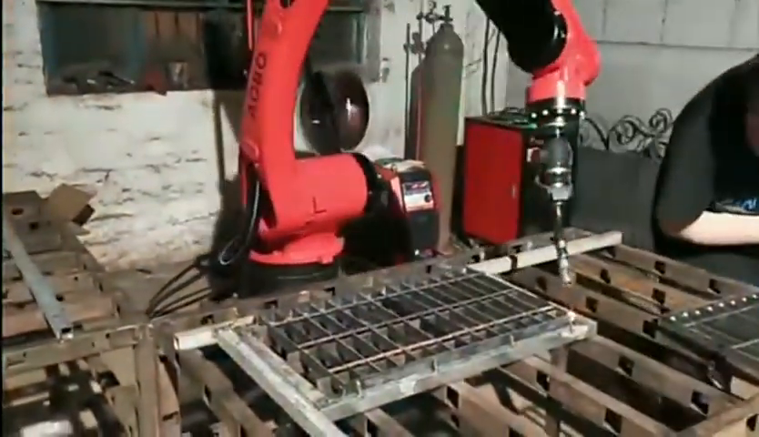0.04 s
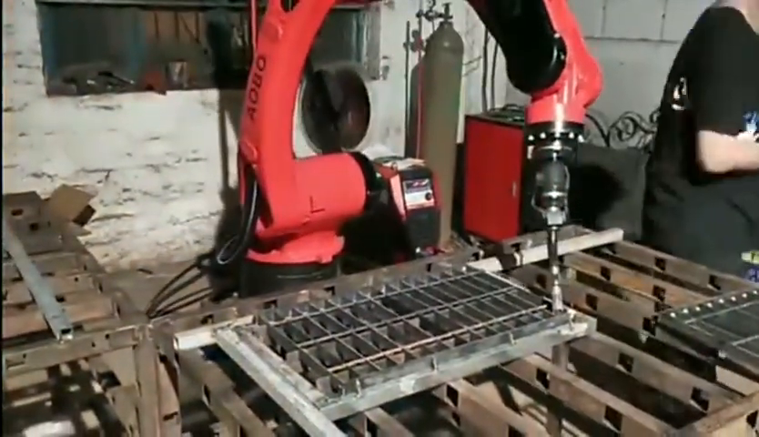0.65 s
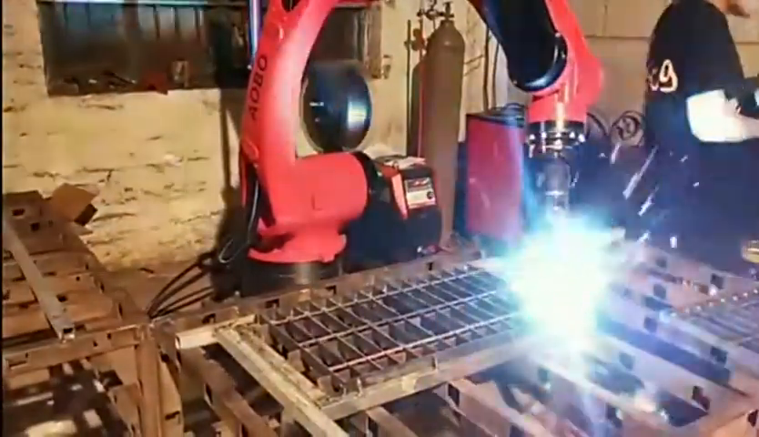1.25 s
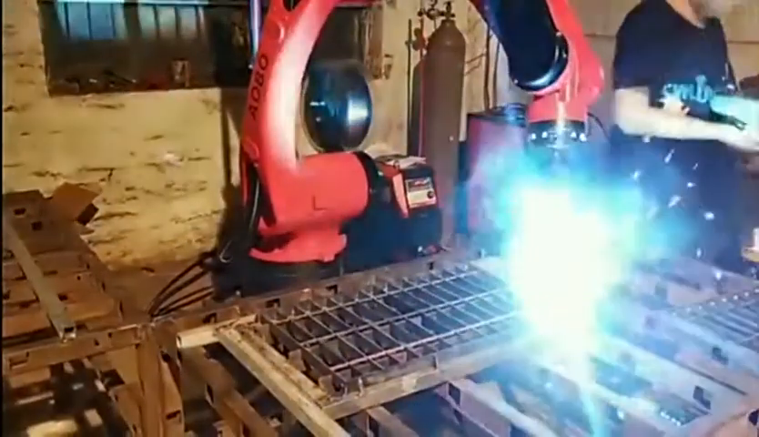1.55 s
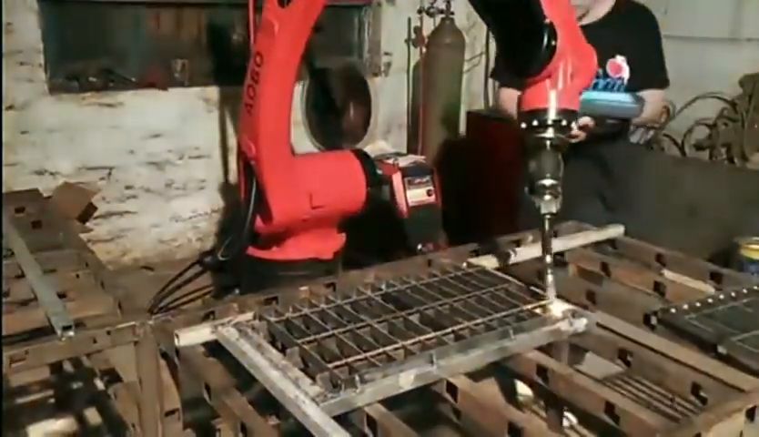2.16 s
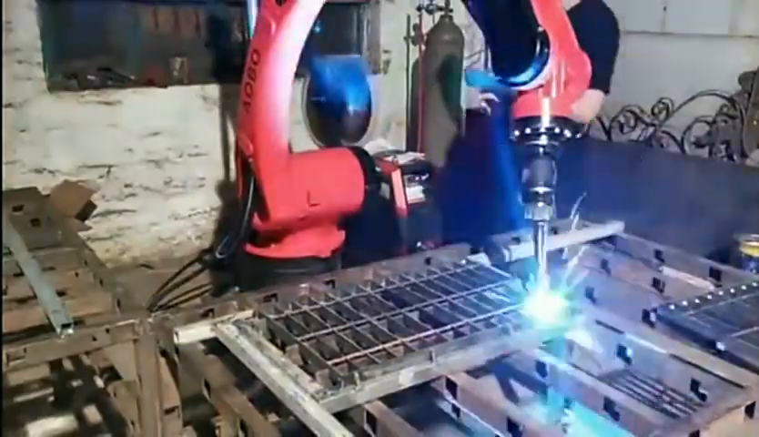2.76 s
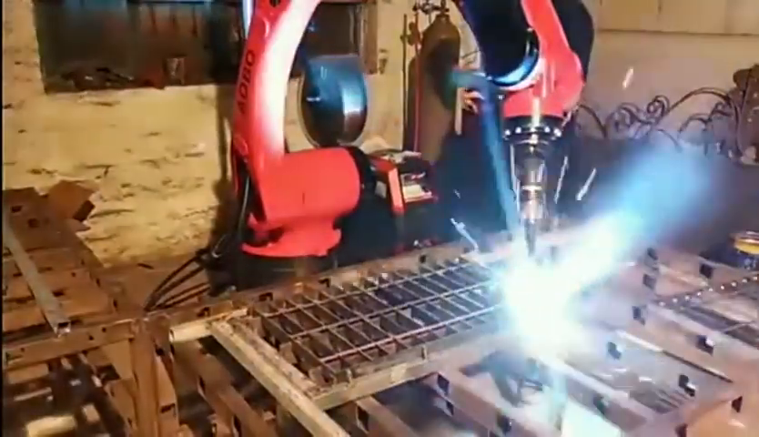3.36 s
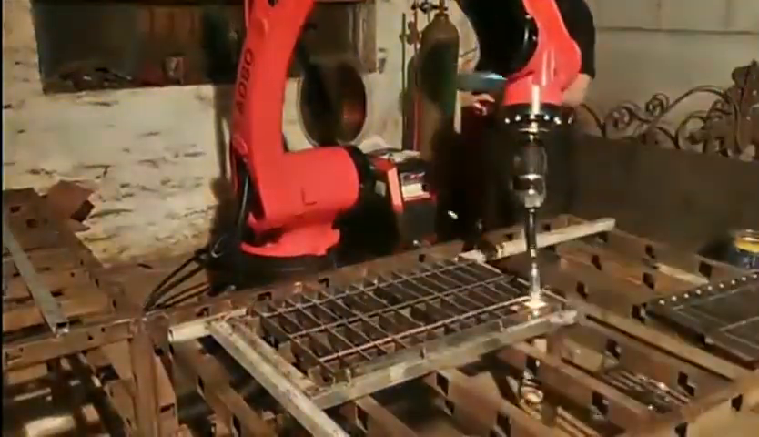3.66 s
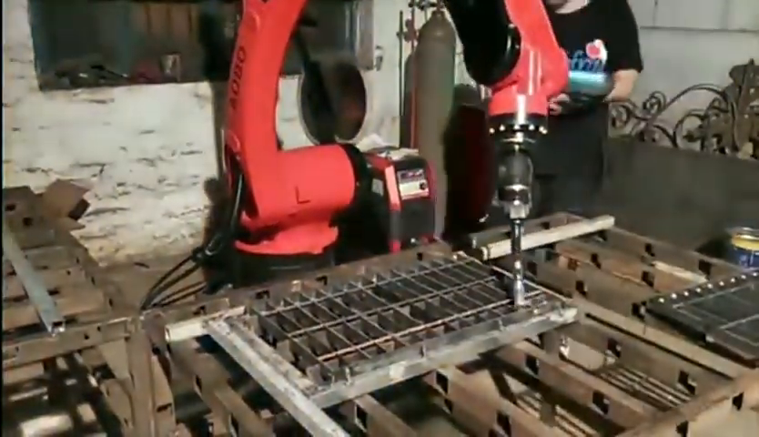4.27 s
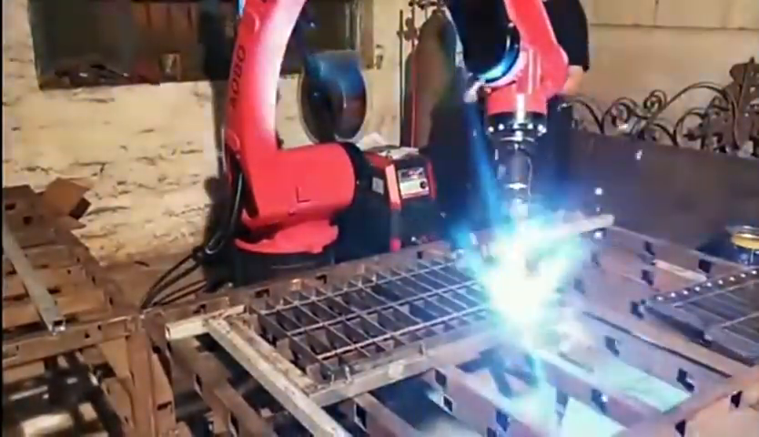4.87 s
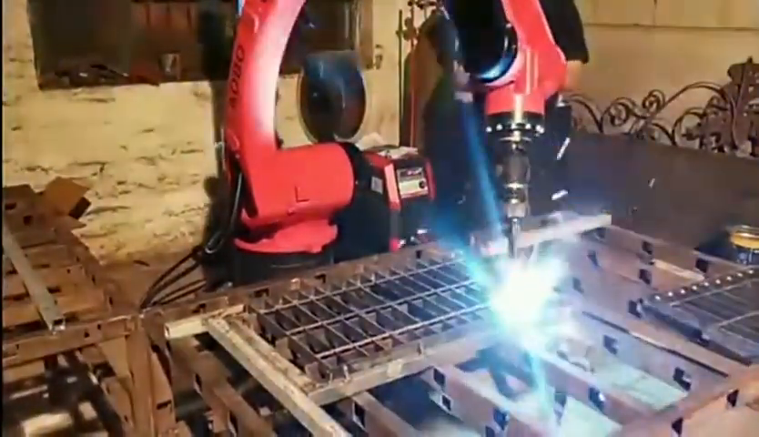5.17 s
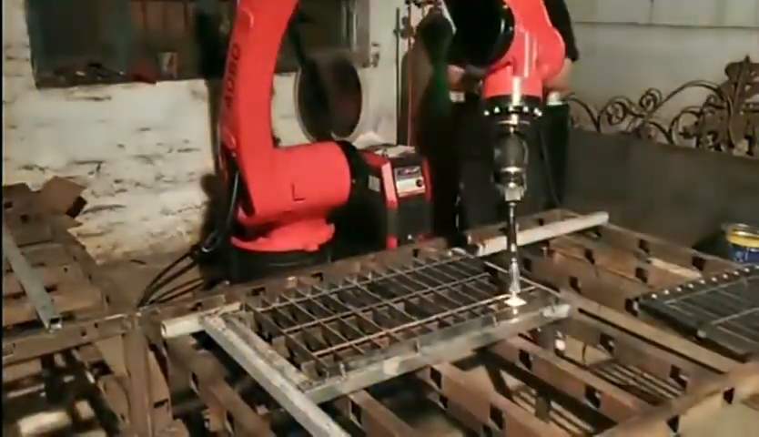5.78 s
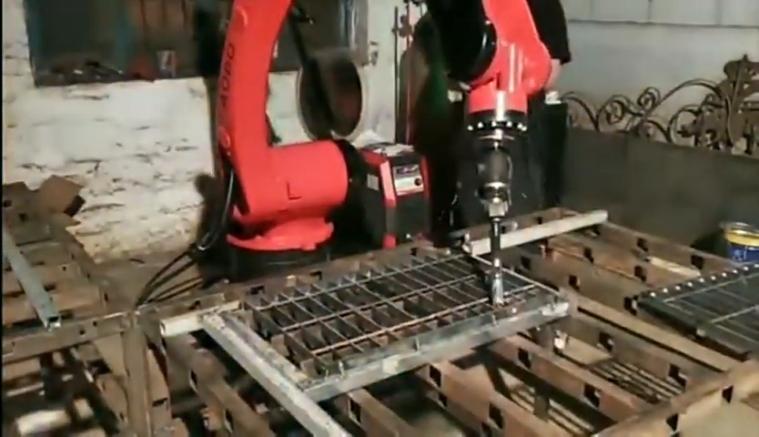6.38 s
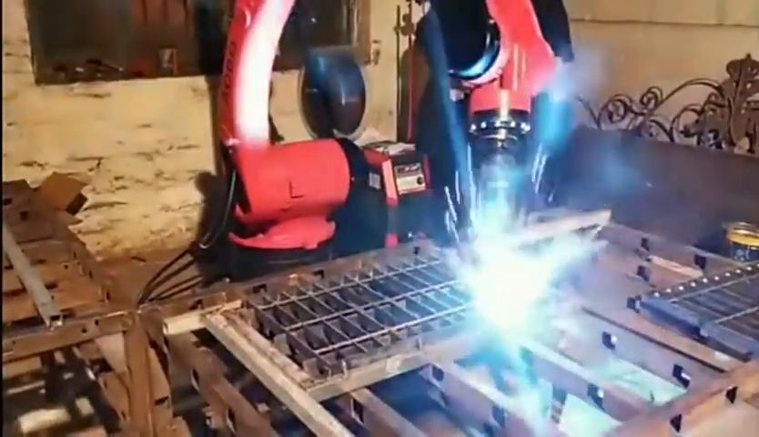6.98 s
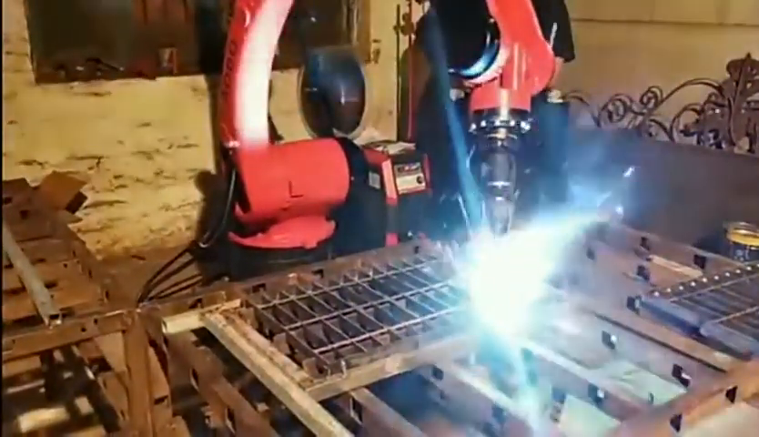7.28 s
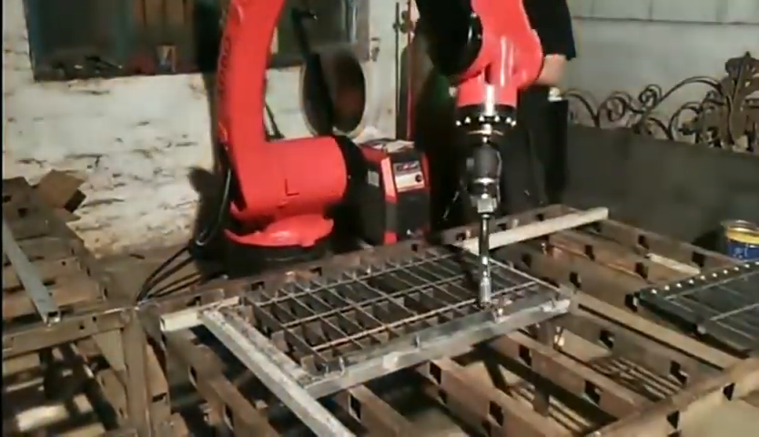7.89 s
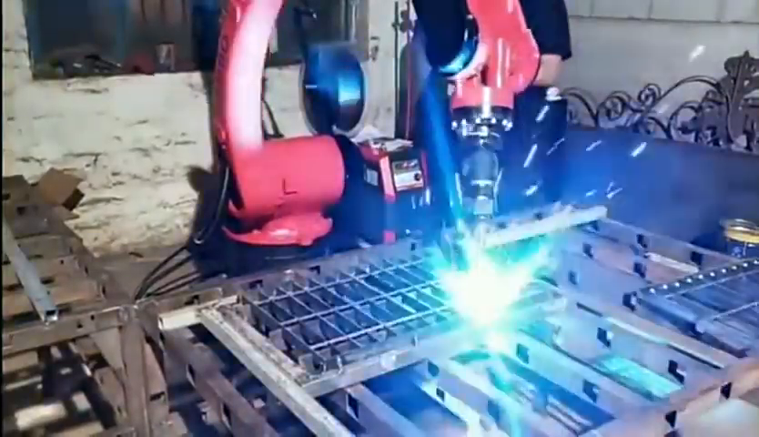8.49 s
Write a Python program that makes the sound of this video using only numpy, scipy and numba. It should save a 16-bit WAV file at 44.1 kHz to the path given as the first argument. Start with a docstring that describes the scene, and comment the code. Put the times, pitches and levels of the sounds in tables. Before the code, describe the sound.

A welding robot's arc sizzles and crackles five times, in bursts of about a second, the last one shorter. Between them, gas hiss and the humming rush of workshop fans swell back, with a faint motor whirr and one brief hollow judder before the third weld. The phone's stereo microphone is close, with the welding to its right, and a few sparks hit it with sharp pops.

```python
"""A workshop, a phone's stereo microphone close to a robot arm laying five short welds on a steel grating.
Fans rush and hum all around. From the right come the hiss of shielding gas at the nozzle and the whirr
of the servos; the arm judders once as it shifts. Each arc fries as the wire shorts into the pool, and
sizzles mostly in the far treble, so the phone's gain control pulls the whole room down while it burns.
Stray sparks land on the microphone's ports and pop."""
import sys
import numpy as np
from scipy import signal
from scipy.fft import rfft, irfft
from scipy.io import wavfile
from scipy.ndimage import uniform_filter1d
from numba import njit

SR = 44100
rng = np.random.default_rng(int(sys.argv[2]) if len(sys.argv) > 2 else 0)


def persist_wave(psi):
    """Save psi, clipped to +-1, as 16-bit WAV."""
    counts = np.round(np.clip(psi, -1, 1) * 32767).astype(np.int16)
    wavfile.write(sys.argv[1], SR, np.atleast_2d(counts).T)


N = 381024
TIME = np.arange(N) / SR
BIN_HZ = np.fft.rfftfreq(N, 1 / SR)
TOP_HZ = 7680  # upper limit of the phone


def undb(db):
    """Decibels to gain."""
    return 10 ** (np.asarray(db) / 20)


def unit(x):
    """Scale to rms 1."""
    return x / np.sqrt(np.mean(x ** 2))


def bell(age, width):
    """A smooth hump, 1 at age 0."""
    return np.exp(-(age / width) ** 2)


def walk(per_s):
    """Random levels, each held 1 / per_s seconds, smoothed twice; rms 1."""
    hold = max(2, int(SR / per_s))
    held = np.repeat(rng.standard_normal(4096), hold)[:N]
    return unit(uniform_filter1d(uniform_filter1d(held, hold), hold))


def filtered(x, order, hz, kind="low"):
    """Butterworth filter."""
    return signal.sosfilt(signal.butter(order, hz, kind, fs=SR, output="sos"), x)


def far_treble(x):
    """Keep only the very top of a sound."""
    return filtered(x, 8, 10500, "high")


def across(points):
    """Read (Hz, value) points at every FFT bin, on a log axis."""
    hz, value = np.transpose(points)
    return np.interp(np.log(BIN_HZ + 1), np.log(hz), value)


def colour(x, points):
    """Shape a sound by (Hz, dB) points, falling away above 8.5 kHz; rms 1."""
    rolloff = 1 / np.hypot(1, (BIN_HZ / 8500) ** 12)
    return unit(irfft(rfft(x) * undb(across(points)) * rolloff, N))


def flutter(x, db, per_s, bands=12, per_octave=2):
    """Turbulence: each band, counted down from the top, rises and falls on its own; rms 1."""
    band = np.clip(np.log2(TOP_HZ / (BIN_HZ + 1)) * per_octave, 0, bands - 1).astype(int)
    spectrum = rfft(x)
    return unit(sum(irfft(spectrum * (band == k), N) * undb(db * walk(per_s)) for k in range(bands)))


def pan(left_db):
    """Gains at the two microphone ports; a negative left_db puts the source on the right."""
    return np.array([[undb(left_db)], [1]])


def echoed(x, share, count=10):
    """Nearby benches and walls return early echoes, other ones to each port, that ripple the spectrum."""
    response = np.zeros((2, N))
    response[:, 0] = 1
    for channel in response:
        channel[rng.integers(40, 700, count)] = share * rng.standard_normal(count)
    return irfft(rfft(x) * rfft(response), N)


def arc_on(strike, end):
    """1 while an arc burns, with a quick strike and a slower dying out."""
    return np.clip((TIME - strike) / 0.036, 0, 1) * np.clip((end - TIME) / 0.065, 0, 1)


# rush of the fans around the room: (frequency [Hz], relative density [dB])
FAN_SPECTRUM = [(25, -14), (60, -10), (115, -0.5), (180, -4), (270, -3), (330, -4.5), (400, -4), (530, 4.7),
                (760, -3.5), (1020, -1.5), (1400, -1.5), (1590, -4), (1700, -2.5), (2000, -2.5),
                (3500, -0.44), (5500, -3.5), (7800, -6)]
# likeness of that rush at the two ports: (frequency [Hz], correlation [0-1])
FAN_LIKENESS = [(60, .88), (150, 1), (470, 0.55), (1000, 0.72), (1900, 0), (3500, 0)]
# its treble leans to the right for a while: (time [s], left minus right [dB])
FAN_LEAN = [(0.7, 2.5), (1.7, -1.5), (2.6, -3.5), (3.7, -1.5), (4.5, -1.5), (5.5, 2)]
def fan_air(lean_above_hz=1460, blade_hz=135.2, chop=0.042):
    """Cooling fans fill the room with a diffuse rush; the blades chop their own air stream."""
    likeness = across(FAN_LIKENESS)
    noise = echoed(rng.standard_normal((2, N)), share=0.036)
    mid, side = rfft(noise) * np.sqrt([1 + likeness, 1 - likeness])
    air = colour(irfft([mid + side, mid - side], N), FAN_SPECTRUM)
    air = flutter(air, db=2.5, per_s=40)
    treble = irfft(rfft(air) * (BIN_HZ > lean_above_hz), N)
    lean_db = np.interp(TIME, *np.transpose(FAN_LEAN))
    air += treble * (undb([lean_db / 2, -lean_db / 2]) - 1)
    return air * (1 + chop * np.sin(2 * np.pi * blade_hz * TIME + walk(11)))


# fan and transformer tones: (frequency [Hz], relative level [dB], change as the hum thins [dB])
HUM_TONES = [(102.3, -71, 0.5), (134.2, -70, 5.5), (199.2, -68, 0.5), (266.8, -72, 3.5), (384, -64.5, -6),
             (403.8, -60.5, -8.5), (512, -59.5, -4.5), (539.6, -65, -2), (636, -71, 3), (676, -66, -4),
             (756, -71.5, -1.5), (809, -70, -8), (947.5, -69.5, 0), (1019, -64.5, -0.5), (1044, -66, 1),
             (1082, -74.5, 1), (1220, -70, 4), (1364, -70, 4), (1394, -74.5, 4), (1470, -77, 4),
             (1537, -71, 1.5), (1680, -69, 1.5), (1710, -77, 1.5), (1914, -78, -0.5)]
# the hum sinks while an arc burns, the high tones most: (frequency [Hz], change [dB])
HUM_UNDER_ARC = [(400, -2), (1000, -3), (1700, -6.5)]
def hum(drift_hz=1.31, drift_share=0.00299, waver_db=3.5, thinnest_s=5.7, thinning_s=1, filling_s=2.1):
    """Blade and mains tones waver, each reaching the two ports in a slightly different phase."""
    out = np.zeros((2, N))
    thinness = bell(TIME - thinnest_s, np.where(TIME < thinnest_s, thinning_s, filling_s))
    welding = sum(arc_on(strike, end) for strike, end, *_ in WELD_ARCS)
    for hz, db, change_db in HUM_TONES:
        pitch_hz = hz + (drift_hz + drift_share * hz) * walk(18)
        phase = 2 * np.pi * np.cumsum(pitch_hz) / SR + 0.59 * walk(60)  # jitter roughens the tone
        lead = 0.2 * (hz / 3000 + walk(13))
        sink_db = np.interp(hz, *np.transpose(HUM_UNDER_ARC)) * welding
        level_db = db + change_db * thinness + sink_db + waver_db * walk(9)
        out += undb(level_db) * np.sin([phase + lead / 2, phase - lead / 2])
    return unit(out)


# the pause before each weld, timed from the end of the arc before it:
# (room swell [dB], rise [s], fade [s], gas post-flow level [dB], post-flow peak time [s])
WELD_PAUSES = [(1, .11, 1.35, -55, 0.62), (3.5, 0.1, 2, -48, 0.36), (7.5, 0.45, 0.44, -47.5, 0.39),
               (8.5, 0.27, 0.21, -68, .45), (3, 0.2, 0.32, -66, .3)]
def pauses(first_pause_s=-0.6, flow_rise_s=0.2, flow_ebb_s=0.31):
    """Between arcs the room swells and settles (dB), and gas flows on over the hot weld (gain)."""
    swell_db, postflow = np.zeros(N), np.zeros(N)
    starts = [first_pause_s] + [end for _, end, *_ in WELD_ARCS]
    for start, (db, rise_s, fade_s, flow_db, peak_s) in zip(starts, WELD_PAUSES):
        age = TIME - start
        swell_db += db * np.clip(age / rise_s, 0, 1) * bell(age, fade_s)
        postflow += undb(flow_db) * bell(age - peak_s, np.where(age < peak_s, flow_rise_s, flow_ebb_s))
    return swell_db, postflow


# hiss of gas at the nozzle: (frequency [Hz], relative density [dB])
NOZZLE_SPECTRUM = [(500, -32.5), (1500, -22), (2800, -14), (4000, -1.5), (5300, 1), (6500, 0.5),
                   (7800, -7.5)]
# lower rush of gas breaking over the work: (frequency [Hz], relative density [dB])
RUSH_SPECTRUM = [(100, -15.5), (400, -2), (1200, 2), (2200, 0), (3000, -1), (3800, 8), (5000, 8.5),
                 (7800, -7)]
def gas(spectrum, lead_ms=0.18):
    """Shielding gas streams with a fine flutter, louder at the right port, a little earlier at the left."""
    jet = rng.standard_normal(N)
    ports = np.array([np.roll(jet, -round(lead_ms * SR / 1000)), jet])
    stream = colour(echoed(ports, share=0.1), spectrum)
    return flutter(stream, db=1.5, per_s=45, bands=5) * pan(left_db=-15)


# the arm moves to the next joint: (middle [s], half length [s], pitch [Hz], level [dB])
ARM_MOVES = [(0.3, 0.42, 1710, -66), (2.2, 0.56, 1697, -62), (3.998, .45, 1668, -57.5)]
def servos(width_hz=130, wander_hz=25):
    """On the right, a rough gear whirr swells and fades with each move, its pitch wandering a little."""
    grain = unit(filtered(rng.standard_normal(N), 2, width_hz / 2))
    wander = wander_hz * walk(10)
    whirr = np.zeros(N)
    for middle, half_s, hz, db in ARM_MOVES:
        phase = 2 * np.pi * np.cumsum(hz + wander) / SR
        whirr += undb(db) * bell(TIME - middle, half_s) * np.sin(phase)
    return np.sqrt(2) * grain * whirr * pan(left_db=-14)


# a short run of slips as the arm shifts: (time [s], length [s], pitch [Hz], level [dB])
ARM_SLIPS = [(4.271, 0.0098, 520, -39.5), (4.286, 0.016, 447, -45), (4.301, 0.013, 453, -36),
             (4.308, 0.022, 480, -33), (4.324, 0.023, 477, -38.5), (4.348, 0.0138, 488, -38),
             (4.379, 0.0275, 453, -43.5)]
def judder(scrape_band_hz=(370, 590), scrape_db=-13):
    """Near the centre, each slip swells and dies in a hollow resonance, with a rough scrape around it."""
    scrape = undb(scrape_db) * unit(filtered(rng.standard_normal(N), 2, scrape_band_hz, "band"))
    out = np.zeros(N)
    for start, length_s, hz, db in ARM_SLIPS:
        age = TIME - start
        swell = np.sin(np.pi * np.clip(age / length_s, 0, 1))
        out += undb(db) * swell * (np.sin(2 * np.pi * hz * age) + scrape)
    return out * pan(left_db=-1)


# sparks right on the microphone: (time [s], pop level [dB], pop left minus right [dB], rise [ms],
# far-treble crack level [dB], share that swings back [0-1], bright snap level [dB])
SPARK_HITS = [(1.1987, -22.5, -11, 0.39, -11.5, .14, -14), (2.8802, -26, -20, 0.22, -25, .03, -45),
              (2.887, -4.5, -22, 0.096, -12, 0.06, -40), (2.8972, -28, -22, .25, -29, .1, -48),
              (3.253, -40, 3, .2, -27, .05, -43), (3.448, -19, -16, 0.068, -6.5, .05, -18.5),
              (3.505, -34, -12, 0.16, -25, .05, -45), (4.685, -32, -14, 0.3, -9.5, .08, -35),
              (4.735, -33, -3, 0.17, -25, .05, -45), (4.9143, -29.5, -9, 0.73, -23, 0.091, -34),
              (4.9308, -10.5, -19, 0.24, -16, .025, -35), (4.9395, -24, -16, 0.37, -28, .03, -48),
              (4.947, -28, -8, 0.23, -11.5, .03, -38), (4.9965, -15, -10, 0.21, -15, 0.05, -27),
              (5.077, -32.5, -6, 0.31, -14, .05, -34), (5.389, -42.5, 1, 0.41, -16, 0.055, -42),
              (6.7708, -31, -23, 0.22, -10, 0.11, -33), (6.9412, -30, -6, 0.13, -11.5, 0.15, -27)]
def sparks(push=1.63, rebound_ms=17, skip_ms=9.5, scuff_ms=6, crack_ms=3, snap_ms=2.6, port_hz=4000):
    """A spark hits a port: pressure shoots up, flips negative and swings back, with a crack and a snap."""
    pops, cracks, snaps = np.zeros((2, N)), np.zeros(N), np.zeros(N)
    grit = unit(filtered(rng.standard_normal(N), 2, hz=1300))
    for hit, db, left_db, rise_ms, crack_db, rebound, snap_db in SPARK_HITS:
        near = np.flatnonzero(np.abs(TIME - hit) < 0.06)
        ms = (TIME[near] - hit) * 1000
        # a slower rise also flips more softly and recovers later, so it sounds duller
        flip = -np.tanh(ms / (0.48 * rise_ms))
        recover_ms = 0.58 + 2.8 * rise_ms
        pressure = np.where(ms < 0, push * np.exp(-abs(ms) / rise_ms), np.exp(-abs(ms) / recover_ms))
        swing = rebound * bell(ms - rebound_ms, width=11)
        # the spark skips along the port just after it lands
        scuff = 0.072 * grit[near] * np.exp(-abs(ms - skip_ms) / scuff_ms)
        pops[:, near] += undb(db) * (flip * pressure + swing + scuff) * pan(left_db)
        cracks[near] += undb(crack_db) * (ms > 0) * np.exp(-abs(ms) / crack_ms)
        snaps[near] += undb(snap_db) * (ms > 0) * np.exp(-abs(ms) / snap_ms)
    crack = far_treble(cracks * rng.standard_normal((2, N)))
    snap = filtered(snaps * rng.standard_normal((2, N)), 2, (4600, 7600), "band")
    return filtered(pops, 6, port_hz) + snap * pan(left_db=-8) + crack


def spatter(per_s=45, scatter_db=3, decay_ms=0.084):
    """Drops of melt burst at random with small sharp ticks."""
    bursts = rng.random(N) < per_s / SR
    sizes = undb(scatter_db * np.clip(rng.standard_normal(N), -2, 2))
    return unit(signal.lfilter([-1], [1, -np.exp(-1000 / (decay_ms * SR))], bursts * sizes))


def wire_crackle(shorts_per_s=105, jitter=0.35, scatter_db=2, spit_s=0.0074, burn=0.039):
    """The wire shorts into the pool at uneven intervals; each restrike spits over the steady burn."""
    gap, size = rng.standard_normal((2000, 2)).T
    at = (np.cumsum(np.exp(jitter * gap)) * SR / shorts_per_s).astype(int)
    restrikes = np.bincount(at[at < N], undb(scatter_db * size[at < N]), N)
    softened = uniform_filter1d(restrikes, size=60)
    spits = unit(signal.lfilter([1], [1, -np.exp(-1 / (spit_s * SR))], softened))
    # the power source holds the mean current steady, so the spits stay fine and even
    spits = unit(spits / (uniform_filter1d(spits, size=2000) + 1e-3))
    return echoed(rng.standard_normal((2, N)) * (burn + spits), share=0.15)


# frying of the arc from close by: (frequency [Hz], relative density [dB])
FRYING_SPECTRUM = [(100, -9), (1000, -13.5), (2500, -8.5), (3700, -5), (4200, 0.5), (4600, 2), (5700, 2),
                   (6150, -8), (6700, 1), (7400, 4.5), (7800, -19.5)]
def frying(crackle, sputter_db=5, sputter_below_hz=4400):
    """The lower part of the arc's crackle sputters while the top fries on evenly."""
    fry = colour(crackle, FRYING_SPECTRUM)
    lower = irfft(rfft(fry) * (BIN_HZ < sputter_below_hz), N)
    sputter = np.std(lower) * flutter(lower, sputter_db, per_s=55, bands=9, per_octave=4)
    return fry - lower + sputter


# the five arcs: (strike [s], end [s], gain [dB], whistling resonance [Hz], its level before gain [dB])
WELD_ARCS = [(0.738, 1.653, -5, 5660, -46.5), (2.672, 3.518, -2.5, 5800, -49.5),
             (4.547, 5.464, -4, 4640, -47), (6.431, 7.317, -4, 5530, -50.5),
             (8.292, 8.691, -2.8, 5400, -70)]
# the arc sputters up in short flares: (time [s], boost [dB])
ARC_FLARES = [(1.03, 3.5), (1.085, 6), (1.27, 5), (1.365, 0), (3.04, 0.5), (3.24, 6), (3.39, 4), (4.79, 0),
              (5.172, 6), (5.192, 3), (5.272, 2), (6.63, 5), (6.76, 1.5), (6.89, 4), (7.09, 2), (7.22, 3.5),
              (8.45, -0.5), (8.585, 1.5)]
def arcs(fry_db=-39.5, spatter_db=-55, sizzle_db=-22.5, flare_half_s=0.014, ring_width_hz=260,
         melt_s=0.051):
    """Close by, each arc sizzles from the strike; its frying builds on the right as the pool melts."""
    crackle = wire_crackle()
    fry = undb(fry_db) * frying(crackle) + undb(spatter_db) * spatter()
    # most of an arc's power lies in the far treble, where it flickers
    sizzle = undb(sizzle_db + 0.88 * walk(25)) * unit(far_treble(crackle))
    flares_db = sum(db * bell(TIME - at, flare_half_s) for at, db in ARC_FLARES)
    surge = undb(flares_db + 0.5 * walk(45)) * pan(left_db=-7)
    out = np.zeros((2, N))
    for strike, end, db, ring_hz, ring_db in WELD_ARCS:
        # the gap between nozzle and work rings a little differently at each joint
        resonance = signal.iirpeak(ring_hz, ring_hz / ring_width_hz, fs=SR)
        ring = undb(ring_db + 1.5 * walk(30)) * unit(signal.lfilter(*resonance, crackle))
        melted = np.clip((TIME - strike) / melt_s, 0, 1)
        out += undb(db) * arc_on(strike, end) * (melted * surge * (fry + ring) + sizzle)
    return out


# the level of fans and gas dips briefly: (time [s], half length [s], depth [dB])
ROOM_DIPS = [(0.5, 0.057, 2.5), (2.37, 0.08, 1.5)]
def scene(air_db=-49, hum_db=-56, hiss_db=-45, rush_db=-57.5, hiss_swell_share=0.65):
    """At the microphone: fans and gas run throughout; the arcs, their sparks and the arm come on top."""
    swell_db, postflow = pauses()
    dip_db = sum(db * bell(TIME - at, half_s) for at, half_s, db in ROOM_DIPS)
    machines = undb(swell_db) * (undb(air_db) * fan_air() + undb(hum_db) * hum())
    hiss = undb(hiss_db + hiss_swell_share * swell_db) * gas(NOZZLE_SPECTRUM)
    rush = (undb(rush_db) + postflow) * gas(RUSH_SPECTRUM)
    return undb(-dip_db) * (machines + hiss + rush) + arcs() + sparks() + servos() + judder()


@njit
def follow(x, attack, release):
    """Rise quickly towards x, and sink back by a constant step."""
    out, level = np.empty(len(x)), 0.
    for i in range(len(x)):
        level = level + (x[i] - level) * attack if x[i] > level else max(level - release, x[i])
        out[i] = level
    return out


def record(dry, threshold_db=-33.5, ratio=4, attack_s=0.0029, release_db_per_s=62):
    """The phone's gain control turns loud passages down and creeps back up; then the top is cut off."""
    power = uniform_filter1d(np.mean(dry ** 2, axis=0), size=600, origin=200)
    excess_db = np.maximum(10 * np.log10(np.abs(power) + 1e-12) - threshold_db, 0)
    cut_db = follow(excess_db * (1 - 1 / ratio), 1 / (attack_s * SR), release_db_per_s / SR)
    lowpass = signal.ellip(14, 0.1, 100, TOP_HZ, fs=SR, output="sos")
    return signal.sosfilt(lowpass, dry * undb(-cut_db))


dry = scene()
out = record(dry)
persist_wave(out)
```